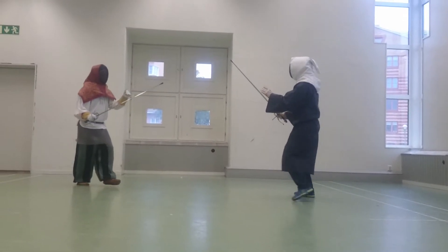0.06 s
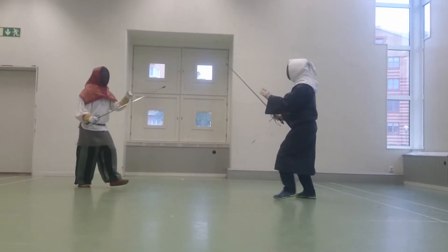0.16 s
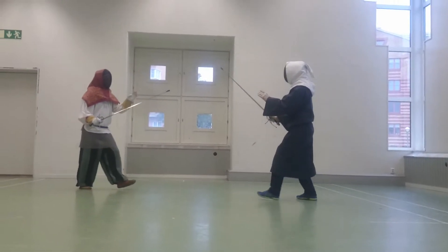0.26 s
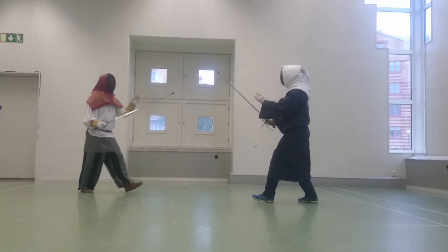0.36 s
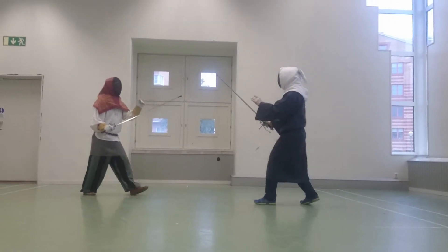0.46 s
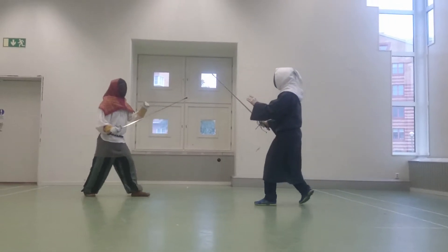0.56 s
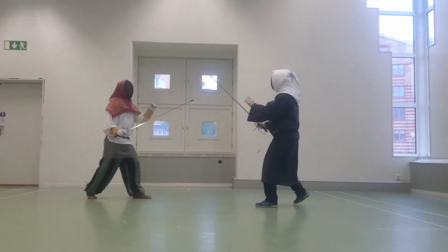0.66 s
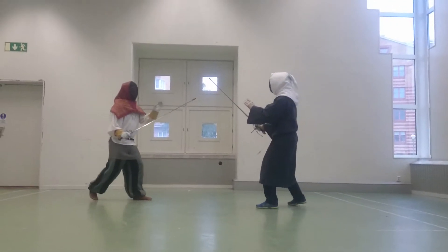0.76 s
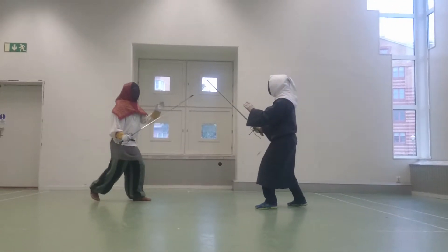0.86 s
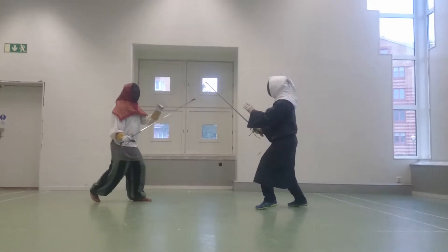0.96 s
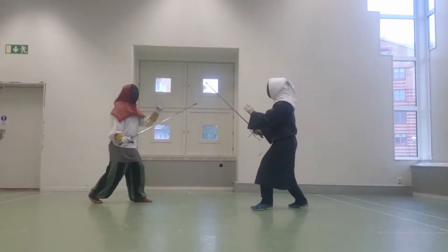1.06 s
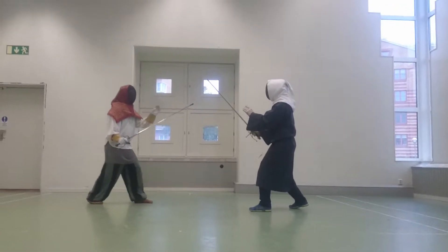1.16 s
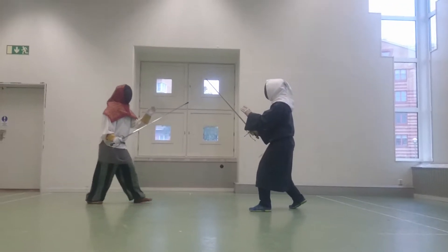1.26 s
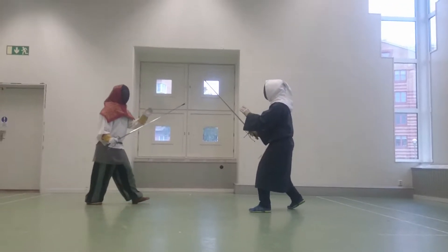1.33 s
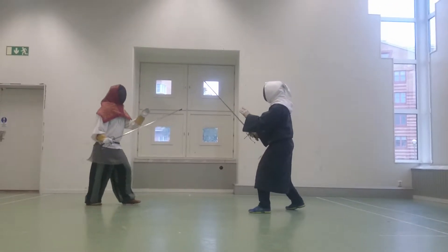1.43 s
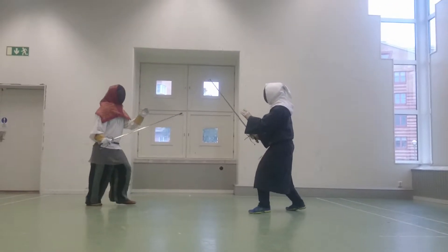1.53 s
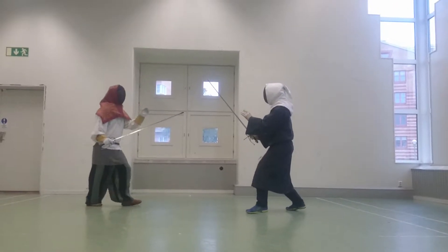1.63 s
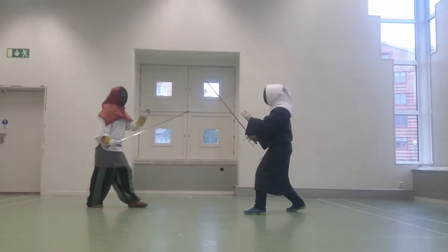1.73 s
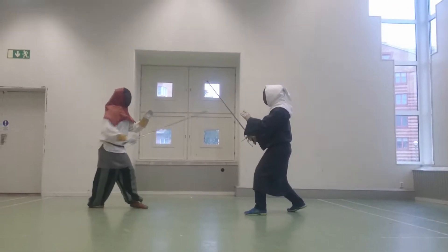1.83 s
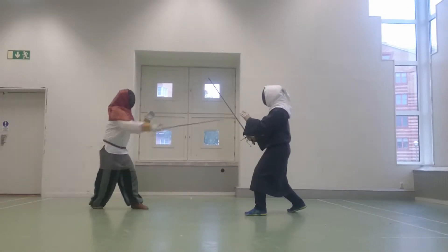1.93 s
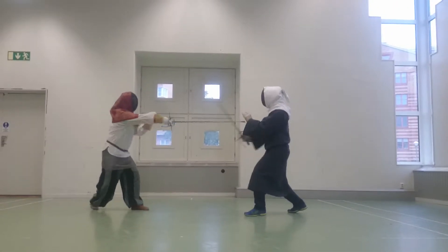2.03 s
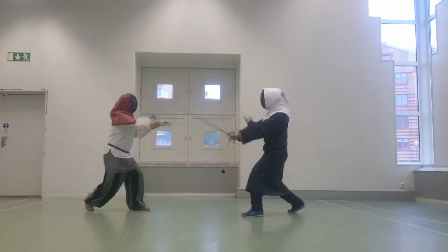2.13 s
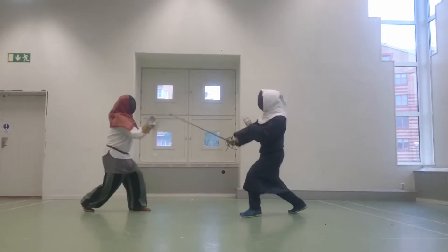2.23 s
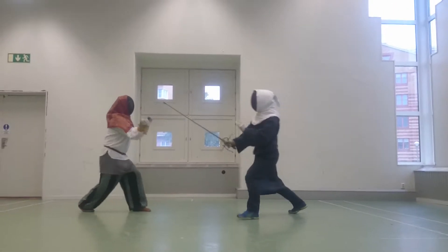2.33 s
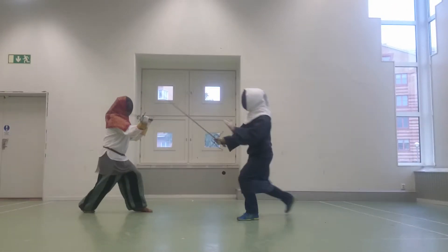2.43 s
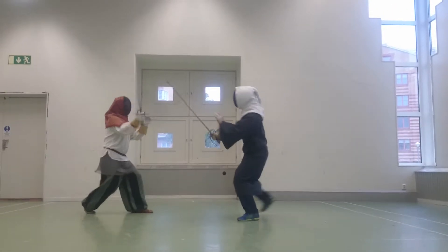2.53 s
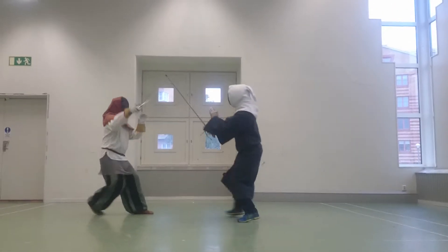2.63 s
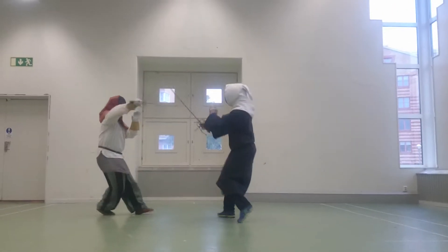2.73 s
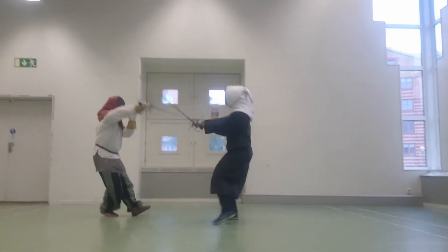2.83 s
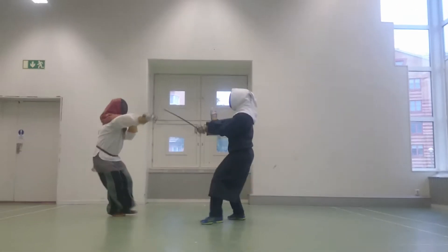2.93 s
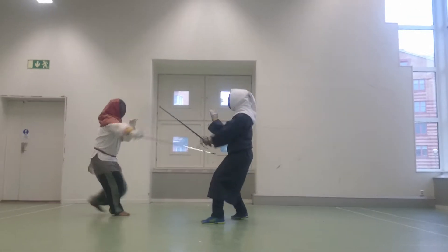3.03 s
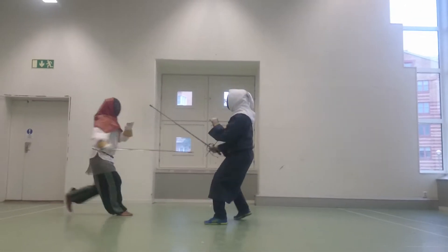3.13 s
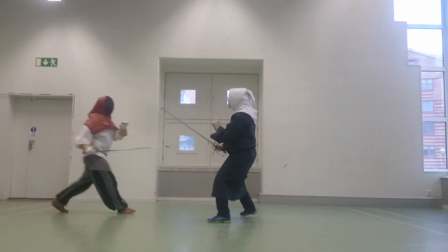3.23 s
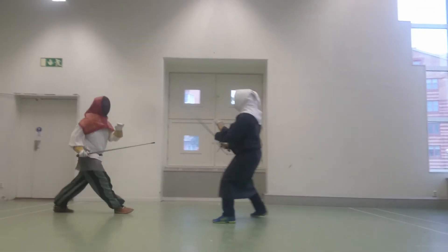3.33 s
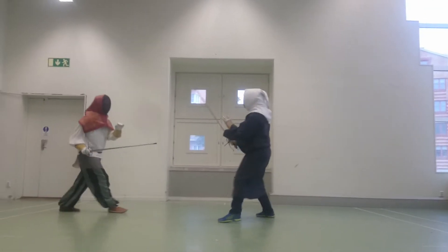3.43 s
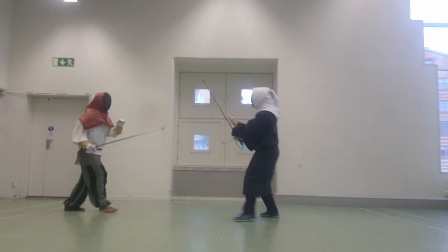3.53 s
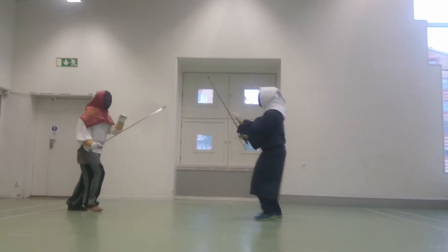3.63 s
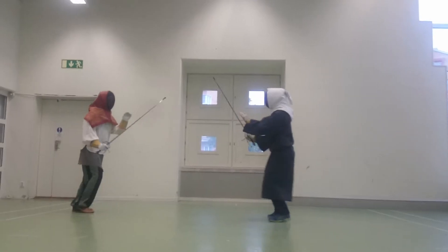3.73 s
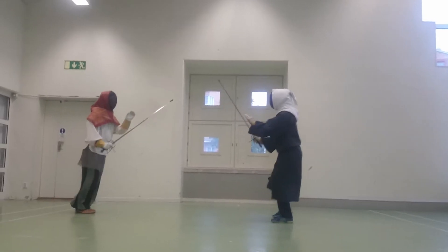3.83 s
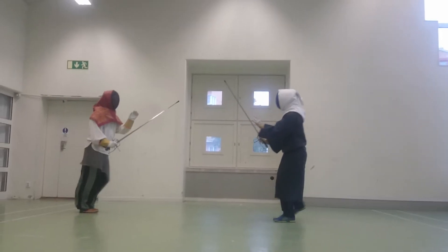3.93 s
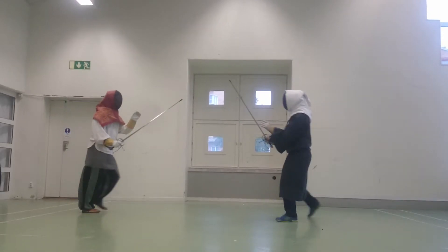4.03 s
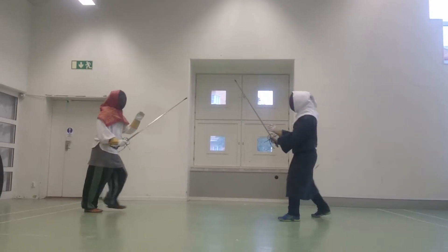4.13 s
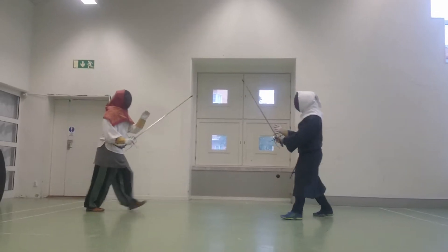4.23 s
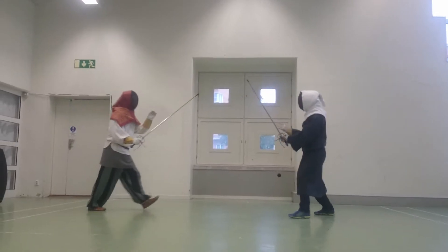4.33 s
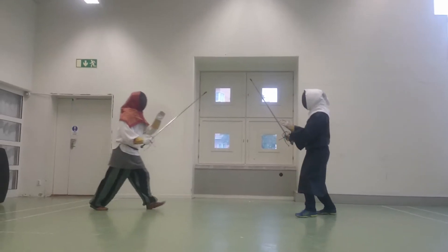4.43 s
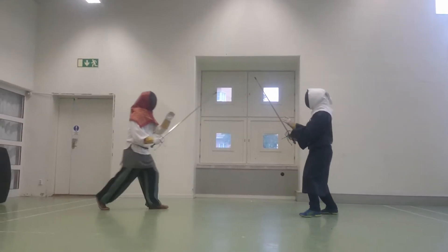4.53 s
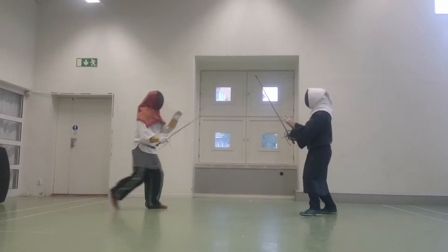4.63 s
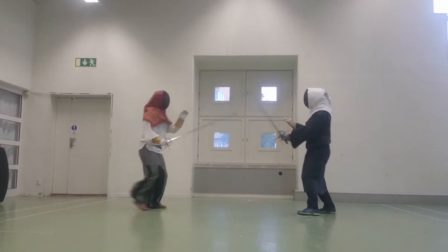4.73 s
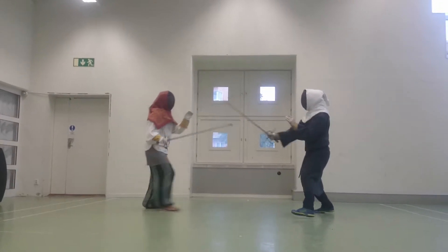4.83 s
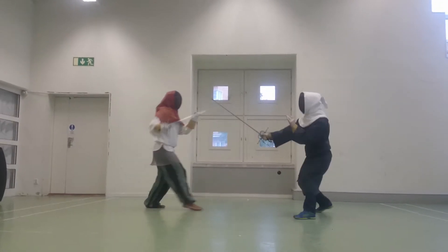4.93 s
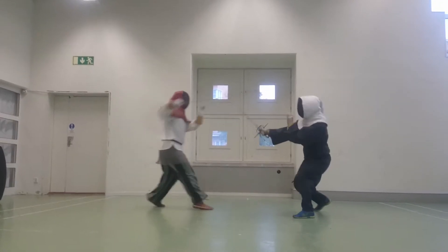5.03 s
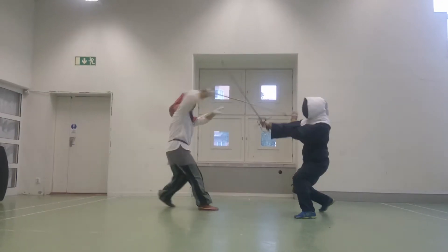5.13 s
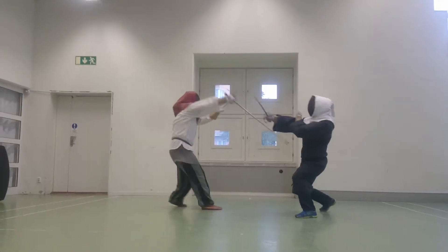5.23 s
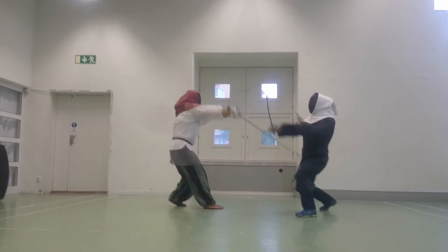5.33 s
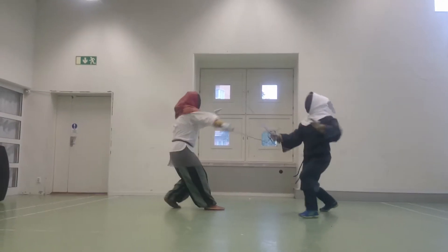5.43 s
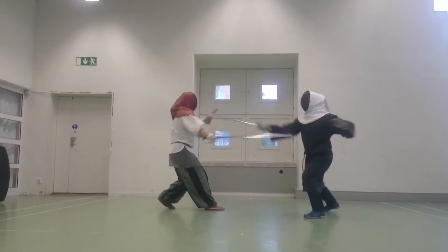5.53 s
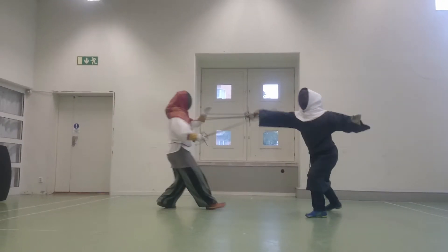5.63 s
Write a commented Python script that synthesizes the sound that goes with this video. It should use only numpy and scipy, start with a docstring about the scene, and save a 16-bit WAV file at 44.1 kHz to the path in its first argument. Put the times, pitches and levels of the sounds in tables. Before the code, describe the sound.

A large, bare sports hall with a low steady ventilation rumble and faint hiss, heard by a stereo microphone at a distance. A faint footfall at 0.2 s and light cloth swishes open it; a few dull steps thud around 1.6-1.8 s. At 2.17 s the blades meet in a quick double crack, dry and high, with a short metallic ring blooming into the hall. Soft steps follow at 2.6 s. At 2.87 s comes a sharper parry, a ragged cluster of clicks with a brief grinding slide and clearer ringing until about 3.1 s. From 3.3 to 4.0 s feet thud heavily and low on the sprung floor, with brushing soles and jackets. It then quietens, with small swishes and a tap near 5.0 s. At 5.24 s the loudest clash bursts out, several hard cracks packed together, sinking in pitch, then further clacks and a scrape from 5.43 s, the reverberation cut off at about 5.6 s.

```python
"""Fencers in a large sports hall

Two fencers spar with steel swords; a stereo microphone hears the blades mostly through the bare hall.
A beat, a parry and a hard bind crack (noise bursts), grind (random slips) and ring (decaying sines).
Feet thud on the sprung floor (sines falling in pitch); soles, jackets and gear swish and tap (coloured noise).
Random reflections carry them to the microphone; steady noise makes the ventilation rumble and faint hiss."""
import sys
import numpy as np
from scipy import signal
from scipy.fft import rfft, irfft, next_fast_len
from scipy.io import wavfile

SR = 44100
rng = np.random.default_rng(int(sys.argv[2]) if len(sys.argv) > 2 else 0)


def log_audio(samples):
    """Write samples as a 16-bit WAV file to the path given in sys.argv[1]."""
    # one column per channel
    frames = np.atleast_2d(samples).T
    # limit to full scale, then quantise
    limited = np.clip(frames, -1, 1)
    pcm = np.round(limited * 32767).astype(np.int16)
    wavfile.write(sys.argv[1], SR, pcm)


N = 250258
TIME = np.arange(N) / SR


# single contacts of the blades, levels before the hall: start_s, level_db, tilt_db (per octave)
BLADE_CONTACTS = [(2.166, -10, -4), (2.191, -12, -0.5), (2.865, -8.5, -2.5), (2.878, -17.5, -2),
                  (2.918, -21, -2.5), (2.940, -18, -6), (2.968, -15.5, 8), (3.064, -13.5, -1.5),
                  (3.089, -19.5, -3), (5.241, -4, 0.5), (5.267, -12.5, -4), (5.281, -5, 4),
                  (5.295, -6, -1.5), (5.428, -9.5, 4.5), (5.451, -14.5, 0.5), (5.495, -11.5, -0.5)]
# modes of the pair of blades, shared out by the point of contact: pitch_hz, beat_db, parry_db, bind_db
BLADE_MODES = [(1601, -42, -39, -30), (2010, -39, -26, -33), (2455, -25, -25, -29), (2619, -42, -29, -28),
               (3030, -33, -26, -26), (3774, -26, -42, -30), (4237, -29, -17, -31), (4409, -24, -22, -27),
               (4554, -19, -19, -23), (4635, -23, -42, -42), (4807, -16, -21, -24), (4870, -16, -23, -23),
               (4925, -27, -19, -22), (5012, -22, -42, -20), (5082, -19, -20, -26), (5157, -21, -18, -23),
               (5215, -42, -12, -26), (5565, -21, -19, -25), (5674, -16, -22, -42), (5813, -20, -42, -21),
               (5925, -24, -29, -21), (6200, -40, -20, -28), (6503, -42, -22, -26), (6697, -26, -38, -39),
               (7810, -42, -31, -41), (7990, -29, -36, -26), (9238, -42, -42, -32), (9590, -42, -40, -35),
               (10184, -38, -42, -28)]
# freer ringing of blades that spring apart than of blades pressed together: one level_db each for beat, parry, bind
FREE_RING_DB = [1, 4, -4.5]
BLADE_T60_S, CRACK_S, CHATTER_S = 0.18, 0.0045, 0.059   # the T60 holds at 5 kHz


def clashes(chatter_db=-9, jangle_db=-6, jangle_t60=0.046, ring_db=-1, hilt_db=-24, count=200, channels=5):
    """Each contact is a hard crack, a brief chatter, a jangle of many damped modes and the longer ring of the blades."""
    out = np.zeros((channels, N))   # one track for each spot where the moving blades meet
    t = TIME[:SR // 3]
    mode_table = np.array(BLADE_MODES)
    rings = ringing(mode_table[:, 0], BLADE_T60_S, SR)
    jangle_hz = np.linspace(1500, 15500, count) + rng.uniform(-35, 35, count)
    jangles = ringing(jangle_hz, jangle_t60, len(t))
    for k, (start_s, level_db, tilt_db) in enumerate(BLADE_CONTACTS):
        spot = out[k % channels]
        kind, edge_hz = engagement(start_s)
        crack = unit(rng.standard_normal(len(t)) * t * np.exp(-2 * t / CRACK_S))
        chatter = from_db(chatter_db) * unit(grains(len(t), 1200, 3.5) * np.exp(-t / CHATTER_S))
        jangle = from_db(jangle_db) * unit(rng.standard_normal(count) @ jangles)
        burst = colour(crack + chatter + jangle, lambda f: tilted_steel_db(f, edge_hz, hilt_db, tilt_db))
        add(spot, start_s, blow(burst, level_db))
        share = from_db(mode_table[:, 1 + kind] + rng.standard_normal(len(mode_table)))
        share *= rng.choice([-1, 1], len(mode_table))
        ring = blow(share @ rings, level_db + ring_db + FREE_RING_DB[kind])
        add(spot, start_s, np.linalg.norm(share) * ring)
    return out


# the blades engage; the crack's lower edge falls as the contact slips towards the hilts:
# start_s, kind, edge_fall (octaves per second)
EXCHANGES = [(2.16, "beat", 2.3), (2.86, "parry", 1.3), (5.235, "bind", 9.6), (5.42, "bind", 1)]
# kinds of exchange, in the order of the blade tables' columns: kind
EXCHANGE_KINDS = ["beat", "parry", "bind"]
EDGE_HZ = 2275   # lower edge of the crack as the blades first meet


def engagement(s):
    """The kind of exchange under way, and the crack's lower edge, which sinks as the contact slips along the blades."""
    start_s, kind, edge_fall = [row for row in EXCHANGES if row[0] <= s][-1]
    return EXCHANGE_KINDS.index(kind), EDGE_HZ * 2 ** (-edge_fall * (s - start_s))


# spectrum radiated by struck steel: pitch_hz, density_db (dB per Hz)
STEEL_SPECTRUM = [(1400, -15.5), (1700, -10.5), (2050, -14.5), (2450, -8.5), (3000, -10), (3700, -8.5),
                  (4900, 1), (5700, -2.5), (7200, -12), (9400, -9.5), (13000, -14), (15500, -13.5)]


def steel_db(hz, edge_hz, hilt_db):
    """Thin blades radiate little below an edge; only the hilts give a weak clack there."""
    radiated = from_db(at_hz(STEEL_SPECTRUM, hz)) / np.sqrt(1 + (edge_hz / hz) ** 20)
    hilt_shape = at_hz([(100, -15.0), (350, -11.5), (750, -5.5), (1150, -8.5), (3000, -1.0)], hz)
    return 20 * np.log10(np.hypot(radiated, from_db(hilt_db + hilt_shape)))


def tilted_steel_db(hz, edge_hz, hilt_db, tilt_db):
    """The steel spectrum tilted by some dB per octave above 2.5 kHz."""
    return steel_db(hz, edge_hz, hilt_db) + tilt_db * np.maximum(octaves(hz), -1)


def ringing(hz, t60, size):
    """Decaying sines of equal energy, one row per mode; the high ones die sooner."""
    t = TIME[:size]
    mode_t60 = t60 * 2 ** (-.4 * octaves(hz[:, None]))
    rings = np.sin(2 * np.pi * hz[:, None] * t) * from_db(-60 * t / mode_t60)
    return rings / np.linalg.norm(rings, axis=1, keepdims=True)


# edge sliding on edge, levels before the hall: start_s, hold_s (time under pressure), level_db
BLADE_SLIDES = [(2.885, 0.082, -17), (5.245, 0.018, -20.5), (5.425, .03, -20), (5.53, 0.08, -26.5)]


def slides(edge_hz=1900, tilt_db=0.0, hilt_db=-14):
    """Nicks in the edges catch on each other as the blades slide, and the hilts rattle."""
    level = sum(from_db(level_db) * pressure(start_s, hold_s) for start_s, hold_s, level_db in BLADE_SLIDES)
    grind = colour(grains(N, 1500, 2.0), lambda f: tilted_steel_db(f, edge_hz, hilt_db, tilt_db))
    return level * unit(grind) * np.sqrt(N)


SLIDE_ATTACK_S, SLIDE_RELEASE_DB_PER_S = 0.0087, 205


def pressure(s, hold):
    """A slide bites quickly, holds, then dies away as the blades part."""
    attack = np.clip((TIME - s) / SLIDE_ATTACK_S, 0, 1)
    return attack * from_db(-SLIDE_RELEASE_DB_PER_S * np.maximum(TIME - s - hold, 0))


def steps(floor_hz=63, sweep_s=0.0037, thud_s=0.03, rumble_db=-19, rumble_s=0.11):
    """Bending waves in the sprung floor: the high ones arrive first, so each thud falls in pitch."""
    out, t = np.zeros(N), TIME[:SR // 2]
    boards = signal.butter(2, [48, 150], "band", fs=SR, output="sos")
    for start_s, level_db, sweep_hz in landings():
        cycles = floor_hz * t + sweep_hz * sweep_s * (1 - np.exp(-t / sweep_s))
        thud = np.sin(2 * np.pi * cycles) * np.exp(-(t / thud_s) ** 2) * (1 - np.exp(-t / 0.0015))
        # waves scattered by the battens rumble on after the thud
        rumble = unit(signal.sosfilt(boards, rng.standard_normal(len(t)))) * np.sqrt(len(t))
        rumble *= np.exp(-t / rumble_s)
        add(out, start_s - .0015, from_db(level_db) * (thud + from_db(rumble_db) * rumble))
    return signal.sosfilt(signal.butter(5, 290, fs=SR, output="sos"), out)


# footfalls, levels relative to each other; a harder step sweeps further, a roll of 0 is a flat landing:
# start_s, level_db, sweep_hz, roll_s (heel to sole)
FOOTFALLS = [(.184, -30.5, 260, 0.0011), (1.62, -36.5, 83, 0), (1.66, -23.5, 160, 0.042),
             (1.770, -26, 150, 0.0036), (2.596, -22, 170, 0.044), (2.685, -27, 68, 0.0011),
             (2.878, -20.5, 23, 0.002), (3.329, -18, 147, 0.0031), (3.384, -19, 147, .037),
             (3.558, -16, 102, .044), (3.665, -23.5, 124, 0.04), (3.733, -21.5, 90, 0.055),
             (3.854, -21, 180, 0), (4.033, -28.5, 187, 0.0043), (4.362, -42, 27, 0.00053),
             (4.546, -44.5, 18, 0.0044)]
SOLE_DB = -2.5   # the sole comes down softer than the heel


def landings():
    """Every blow on the floor as (start_s, level_db, sweep_hz): a rolling foot lands twice, heel then sole."""
    heels = [(start_s, level_db, sweep_hz) for start_s, level_db, sweep_hz, _ in FOOTFALLS]
    soles = [(start_s + roll_s, level_db + SOLE_DB, sweep_hz)
             for start_s, level_db, sweep_hz, roll_s in FOOTFALLS if roll_s > 0]
    return heels + soles


# swishes of soles and jackets, levels before the hall: start_s, length_s, level_db
SWISHES = [(0.362, 0.067, -56), (1.069, 0.15, -50), (1.441, 0.11, -46.5), (1.715, 0.14, -40.5),
           (1.986, 0.42, -45), (2.682, .14, -43.5), (3.429, 0.091, -35.5), (3.541, 0.1, -37.5),
           (3.679, 0.34, -47.5), (3.951, 0.68, -50.5), (4.791, 0.097, -42.5), (4.87, 0.13, -36.5),
           (5.035, 0.24, -43)]
# spectrum of rubbing cloth and soles: pitch_hz, density_db (dB per Hz)
SWISH_SPECTRUM = [(700, -38), (1500, -15.5), (2400, -4), (3300, -5.5), (4400, 2), (5500, 2), (7200, -13.5),
                  (10000, -14.5), (15000, -21)]
SWISH_PLAIN_DB, SWISH_TILT_PER_DB = -44.5, .5   # level of an untilted swish; dB per octave gained per dB above it


def swishes():
    """Cloth and soles rub in soft swells; the louder ones are brighter."""
    out = np.zeros(N)
    for start_s, length_s, level_db in SWISHES:
        size = int(length_s * SR)
        tilt_db = SWISH_TILT_PER_DB * (level_db - SWISH_PLAIN_DB)
        rub = colour(grains(size, 6000, 4.0),
                     lambda f: at_hz(SWISH_SPECTRUM, f) + tilt_db * np.maximum(octaves(f), -2))
        swell = np.sin(np.pi * np.arange(size) / size)
        add(out, start_s, from_db(level_db) * unit(rub * swell) * np.sqrt(size))
    return out


# short scuffs and taps of shoes and gear, levels relative to each other: start_s, level_db, pitch_hz, decay_s
SCUFFS = [(.73, -60, 880, 0.027), (2.05, -52, 916, .064), (2.58, -49, 677, 0.014),
          (2.644, -48, 1200, 0.0018), (2.828, -37.5, 3960, 0.006), (3.325, -41.5, 1080, 0.0037),
          (4.58, -52.5, 1053, 0.028), (5.017, -33.5, 2880, 0.0075), (5.03, -52, 756, .043)]
SLAP_DB, SLAP_HZ, SLAP_S = -34, 362, 0.028   # the shoe's own slap; its level follows that of the footfall


def scuffs(skirt_db=11):
    """A shoe or a piece of gear taps or drags: a puff of noise around one pitch."""
    out, t = np.zeros(N), TIME[:SR // 3]
    slaps = [(start_s, level_db + SLAP_DB, SLAP_HZ, SLAP_S) for start_s, level_db, _ in landings()]
    for start_s, level_db, pitch_hz, decay_s in [*SCUFFS, *slaps]:
        puff = rng.standard_normal(len(t)) * t * np.exp(-2 * t / decay_s)
        puff = colour(puff, lambda f: -skirt_db * np.abs(np.log2(f / pitch_hz)))   # skirt in dB per octave
        add(out, start_s, blow(puff, level_db))
    return out


# reverberation time of the hall: pitch_hz, t60_s
HALL_T60 = [(100, 2.5), (600, 2.6), (2400, 1.22), (5000, 1.09), (9000, 0.96), (15000, 0.42)]
# echoes of the nearest walls: delay_s, level_db
WALL_ECHOES = [(.015, -10), (0.0256, -11.5), (.050, -26)]


def hall(direct_db=-8, build_s=0.0081, tail_db=-1, smear_s=0.00076):
    """Stereo response of the hall: direct sound, three wall echoes, then a dense tail whose treble dies first."""
    t = TIME[:int(1.6 * SR)]
    hz = np.maximum(np.arange(len(t) // 2 + 1) * SR / len(t), 1)
    white = rfft(rng.standard_normal((2, len(t))))
    centres = np.geomspace(100, 16000, 14)
    tail = 0
    # overlapping triangular bands, each with its own decay
    for centre, peak in zip(centres, np.eye(len(centres))):
        band = irfft(white * np.interp(np.log(hz), np.log(centres), peak), len(t))
        tail = tail + band * from_db(-60 * t / at_hz(HALL_T60, centre))
    response = from_db(tail_db) * unit(tail * (1 - np.exp(-(t / build_s) ** 2)))
    response[:, 0] += from_db(direct_db)
    for delay_s, level_db in WALL_ECHOES:
        smear = unit(rng.standard_normal((2, len(t))) * np.exp(-t / smear_s))
        response += from_db(level_db) * np.roll(smear, round(delay_s * SR), axis=1)
    return response


# spectrum of the rumble and hiss: pitch_hz, density_db (dB per Hz)
HISS_SPECTRUM = [(15, -69), (25, -2.5), (64, -1), (119, -5.5), (204, -14.5), (340, -18.5), (410, -23),
                 (482, -24), (684, -21.5), (1380, -24.5), (2120, -15.5), (3090, -18.5), (5010, -11.5),
                 (7100, -33), (15500, -43)]
# left-right likeness of the rumble and hiss: pitch_hz, likeness (0 to 1)
RUMBLE_LIKENESS = [(60, 1), (150, 1), (400, 0.97), (1200, 0.037)]
HISS_DB = -50


def hiss():
    """Ventilation rumble, alike on both sides, under a diffuse hiss."""
    mid, side = rng.standard_normal((2, N))

    def side_db(f):
        """Level of the side signal against the mid that gives the likeness."""
        alike = np.clip(at_hz(RUMBLE_LIKENESS, f), 0, .99)
        return 10 * np.log10((1 - alike) / (1 + alike))

    mid = colour(mid, lambda f: at_hz(HISS_SPECTRUM, f))
    side = colour(side, lambda f: at_hz(HISS_SPECTRUM, f) + side_db(f))
    return from_db(HISS_DB) * unit(np.array([mid + side, mid - side])) * np.sqrt(N)


def from_db(db):
    """Decibels to gain."""
    return 10 ** (np.asarray(db) / 20)


def unit(x):
    """Scale to a total energy of one per channel, on average."""
    return x / np.sqrt(np.mean(np.sum(x ** 2, axis=-1)) + 1e-20)


def at_hz(points, hz):
    """Read a table on a log-frequency axis."""
    f, value = np.transpose(points)
    return np.interp(np.log(np.maximum(hz, 1)), np.log(f), value)


def colour(x, db_at):
    """Causal (minimum-phase) filter whose gain in dB is a function of frequency."""
    size = 2 * next_fast_len(x.shape[-1] // 2 + 2048)
    hz = np.maximum(np.arange(size // 2 + 1) * SR / size, 10)
    cepstrum = irfft(np.log(from_db(db_at(hz))))
    # folding the cepstrum onto positive times makes the phase minimal
    cepstrum[1:size // 2] *= 2
    cepstrum[size // 2 + 1:] = 0
    return irfft(rfft(x, size) * np.exp(rfft(cepstrum)))[..., :x.shape[-1]]


def octaves(hz):
    """Octaves above 5 kHz, the middle of the steel's range."""
    return np.log2(hz / 5000)


def add(track, s, sound):
    """Mix a sound in at a time."""
    start = max(round(s * SR), 0)
    track[start:start + len(sound)] += sound[:max(N - start, 0)]


def grains(size, per_s, spread_db):
    """Random tiny slips of uneven strength; rms one."""
    strength = from_db(spread_db * np.minimum(rng.exponential(1, size), 4)) * rng.standard_normal(size)
    slips = rng.random(size) < per_s / SR
    return unit(strength * slips) * np.sqrt(size)


def blow(x, level_db):
    """Give a short sound the energy of a hundredth of a second at this level."""
    return unit(x) * from_db(level_db) * np.sqrt(SR / 100)


def scene(boom_db=-17, thud_db=-2, near_db=-8):
    """Steel is heard mostly through the hall; scuffs are a little drier, and the thuds come straight through the floor."""
    thuds, taps = from_db(thud_db) * steps(), scuffs()
    spots = [*clashes(), slides(), swishes() + taps + from_db(boom_db) * thuds]
    # every spot in the hall has its own pattern of reflections
    airborne = sum(signal.oaconvolve(x[None], hall(), axes=1)[:, :N] for x in spots)
    return airborne + thuds + from_db(near_db) * taps + hiss()


# the two microphone ports resonate differently: pitch_hz, level_db (left minus right)
MICROPHONE_PORTS = [(80, -10), (250, -5.5), (700, -2), (1300, -5), (2300, -10), (3300, -4.5), (4200, -5.5),
                    (5500, -15), (7500, -3), (10000, 2), (12500, -3), (15000, -14)]
CUTOFF_HZ = 15900


def record(dry):
    """Each microphone port colours its channel, peaks are rounded, the top is cut."""
    def port_db(f, sign):
        """Gain of one port; the power of the pair stays constant."""
        return 10 * np.log10(2 / (1 + from_db(sign * at_hz(MICROPHONE_PORTS, f)) ** 2))

    left = colour(dry[0], lambda f: port_db(f, -1))
    right = colour(dry[1], lambda f: port_db(f, 1))
    rounded = 1.249 * np.tanh(np.array([left, right]) / 1.428)
    return signal.sosfilt(signal.ellip(10, .3, 75, CUTOFF_HZ, fs=SR, output="sos"), rounded)


dry = scene()
out = record(dry)
log_audio(out)
```